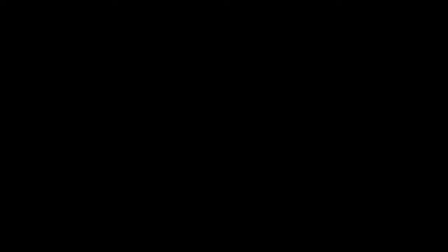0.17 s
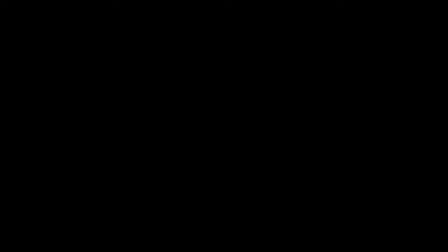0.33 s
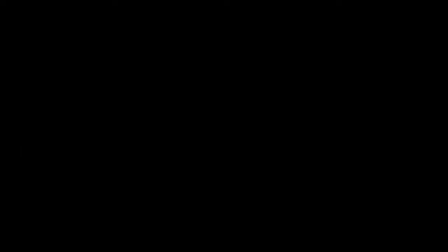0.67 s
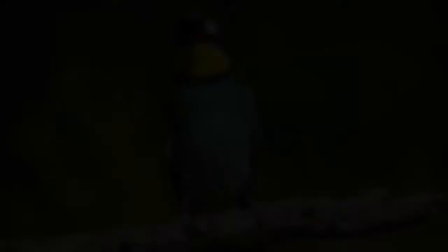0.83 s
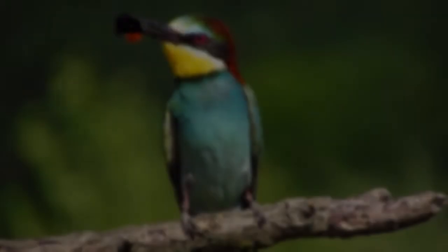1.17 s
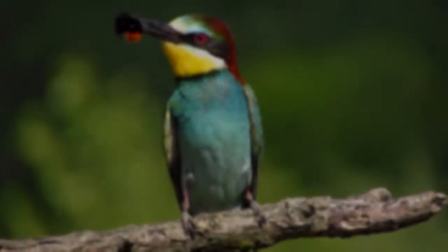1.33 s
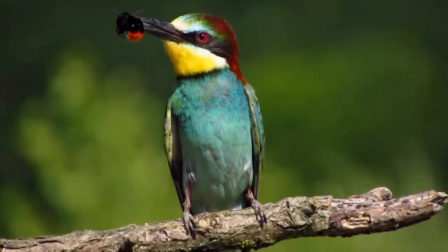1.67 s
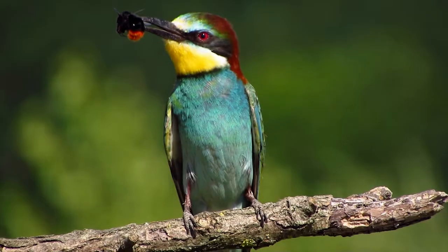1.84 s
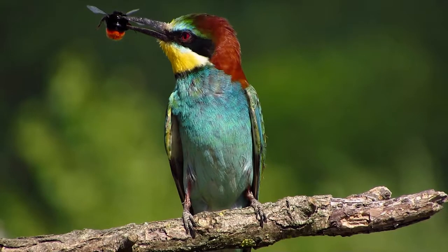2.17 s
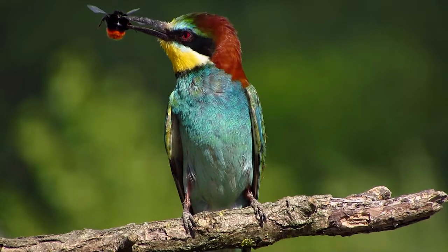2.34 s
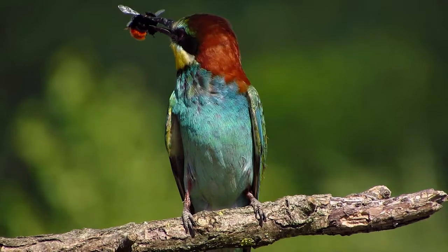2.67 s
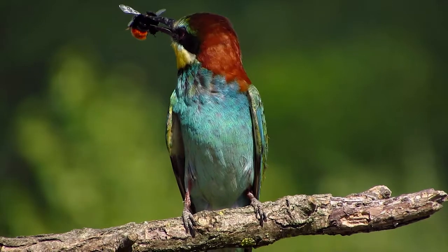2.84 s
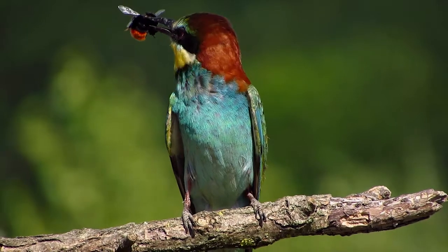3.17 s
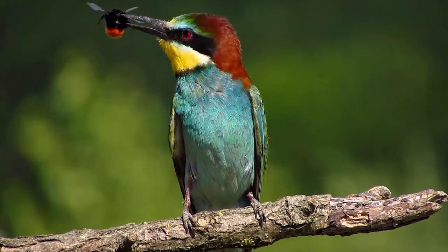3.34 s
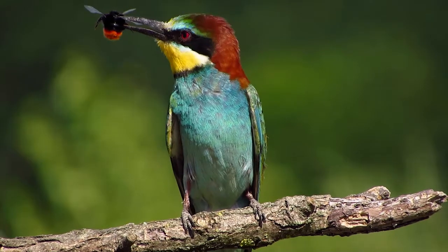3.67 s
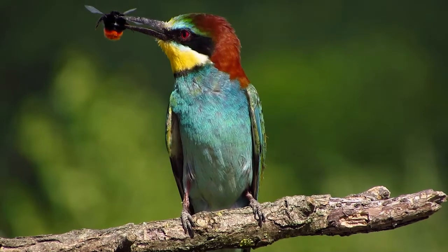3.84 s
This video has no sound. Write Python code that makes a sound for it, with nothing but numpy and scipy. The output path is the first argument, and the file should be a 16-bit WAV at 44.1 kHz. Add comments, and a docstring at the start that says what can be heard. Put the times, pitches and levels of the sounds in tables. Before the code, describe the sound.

A bee-eater gives very short, rounded whistled pips near 0.2, 0.6, 1.0 and 3.3 seconds, the first almost lost as everything fades in from silence until about 1.9. A farther bird answers in lower soft pairs near 1.8 and 3.5. Faint songbird notes come before 1.4, grasshopper scrapes near 1.7, 2.8 and 3.9; a frog rattles, slowing, from 3.1 to 3.8, over soft hiss and hollow drone.

```python
"""A branch outdoors: a bee-eater gives four short, soft pips, and a second bird answers from farther off.
A water frog rattles once, beside a faint songbird and a grasshopper; the whole scene fades in from silence.
The birds are gliding sines, the near one with an octave lifted by a throat resonance.
The frog is a pulsed stack of harmonics; the grasshopper is high noise gated into strokes.
Behind them lie a fine hiss of shaped noise and a hollow drone of noise in narrow resonances."""
import sys
import numpy as np
from scipy import signal
from scipy.io import wavfile
from scipy.ndimage import uniform_filter1d

SR = 44100
rng = np.random.default_rng(int(sys.argv[2]) if len(sys.argv) > 2 else 0)


def dump_mix(stems):
    """Bounce the given channels to the path in sys.argv[1] as a 16-bit WAV at rate SR."""
    frames = np.atleast_2d(stems).T  # one column per channel
    limited = np.clip(frames, -1, 1)  # hard clip at full scale
    pcm = np.round(limited * 32767).astype(np.int16)
    wavfile.write(sys.argv[1], SR, pcm)


N = 176400
T = np.arange(N) / SR  # time in s
FFT_SIZE, HOP = 4096, 1024  # samples
HZ = np.fft.rfftfreq(FFT_SIZE, 1 / SR)


def amp(db):
    """Decibels to gain."""
    return 10 ** (np.asarray(db) / 20)


def unit(x):
    """Scales to rms 1."""
    return x / np.sqrt(np.mean(x ** 2) + 1e-20)


def smooth(x, size, axis=-1):
    """Moving average over a number of points."""
    return uniform_filter1d(x, size=size, axis=axis)


def read(points):
    """Reads a table over frequency, joined on a log axis."""
    f, value = np.transpose(points)
    return np.interp(np.log(HZ + 1), np.log(f + 1), value)


def glide_phase(hz):
    """Adds up a moving frequency into phase, in radians."""
    return 2 * np.pi * np.cumsum(hz) / SR


def panned(x, pan_db):
    """Sets the left channel against the right, which keeps its level."""
    return np.array([x * amp(pan_db), x])


def noise(gain, same, lead, patchy_db, flicker_db):
    """Stereo noise of rms 1 with a given spectrum, drifting patches and a shared flicker."""
    frames = N // HOP + 5
    a, b, c, d, patches = rng.standard_normal((5, frames, len(HZ)))
    patches = smooth(patches, 6, axis=0)  # over time
    patches = unit(smooth(patches, 16, axis=1))  # over frequency
    flicker = unit(smooth(rng.standard_normal(frames), 3))[:, None]
    same = np.clip(same, -1, 1)  # left-right likeness: 1 alike, 0 unrelated, -1 opposed
    right = a + 1j * b
    left = same * right + np.sqrt(1 - same ** 2) * (c + 1j * d)
    spectra = np.array([left * np.exp(1j * lead), right])
    spectra *= gain * amp(patchy_db * patches + flicker_db * flicker)
    sound = signal.istft(spectra.swapaxes(1, 2), nperseg=FFT_SIZE, noverlap=FFT_SIZE - HOP)[1]
    return unit(sound[:, :N])


def air():
    """Soft wide rush and hiss: noise shaped in colour and stereo width."""
    # broad spectrum: f/Hz, relative level/dB per Hz
    colour = [(10, -10), (25, 0), (100, 3.5), (220, 5), (450, 7.5), (650, -1), (1000, 0), (1200, 1),
              (1400, 0.5), (2000, -4), (2800, -3.5), (3600, -6.5), (4600, -9.5), (7000, -9.5), (8500, -14),
              (9300, -11.5), (10000, -15), (13000, -19.5), (14500, -28.5)]
    # stereo width: f/Hz, left-right likeness
    likeness = [(25, 0.99), (70, 0.028), (130, -0.68), (220, -0.84), (500, -0.78), (680, 0.18),
                (1150, -0.14), (1500, -0.23), (2500, -0.00011), (14000, 0.086)]
    level_db = -49.5
    return amp(level_db) * noise(amp(read(colour)), read(likeness), 0, patchy_db=0.87, flicker_db=0.66)


def drone():
    """Hollow distant ambience: noise ringing in narrow, fixed resonances."""
    # resonances: f/Hz, width/Hz, relative level/dB
    resonances = [(276.2, 7.4, -4.5), (291.3, 24, -11.5), (355.5, 5.4, -10.5), (482, 7.7, -10.5),
                  (586.5, 23.7, 4.5), (662, 44, -9.5), (715, 24.6, 1.5), (752, 27, 0), (800, 56, -2.5),
                  (911, 69, -3.5), (993.3, 30, -4), (1140, 59.6, -12), (1235, 22.4, -7.5)]
    # phase by which the left leads: f/Hz, lead/rad
    left_lead = [(280, -.3), (580, -0.98), (780, -1.02), (1000, -0.87), (1250, -0.3)]
    # slow swell: t/s, change of level/dB
    swell = [(0, -0.2), (1.2, 0.46), (2, -0.1), (2.5, 0.3), (3, 0.5), (4, 1.3)]
    level_db, likeness = -48, .93
    power = sum(amp(db) ** 2 / (1 + ((HZ - hz) / width) ** 2 * 2) ** 2 for hz, width, db in resonances)
    level = amp(level_db + np.interp(T, *np.transpose(swell)))
    return level * noise(np.sqrt(power), likeness, read(left_lead), patchy_db=1.12, flicker_db=0.1)


def pip(top_s, top_hz, db, pan_db, lead_in_db):
    """A near-pure whistle; its octave shows as it sweeps through the throat resonance."""
    # a swoop up and down, its level dipping briefly just after the top: t/s from the top, pitch/top pitch,
    # level/dB
    shape = [(-.031, .64, -32), (-.019, .75, -14), (-.0125, 0.95, -23), (-.009, .905, -7), (-.004, .97, -8),
             (-.0015, .995, 1), (.001, 0.92, -3.5), (.0045, .96, -3), (.006, .93, -31), (.008, .9, -5.5),
             (.013, .86, -8.5), (.017, .81, -19), (.028, .74, -34)]
    lead_in_s = .012  # points earlier than this before the top take the lead-in level
    octave_db, throat_db = -29, -5  # octave's floor and the resonance's lift
    throat_hz, throat_width_hz = 2980, 240
    s, ratio, level = np.transpose(shape)
    level = level + lead_in_db * (s < -lead_in_s)
    hz = top_hz * smooth(np.interp(T - top_s, s, ratio), 90)
    envelope = smooth(amp(np.interp(T - top_s, s, level, left=-200, right=-200)), 50)
    phase = glide_phase(hz)
    resonance = 1 / (1 + ((2 * hz - throat_hz) / throat_width_hz) ** 4)
    octave = amp(octave_db) + amp(throat_db) * resonance
    whistle = np.sin(phase) + octave * np.sin(2 * phase)
    return panned(amp(db) * envelope * whistle, pan_db)


def near_bird():
    """The bee-eater's pips, each a whistled arch of its own pitch and level."""
    # pips: t/s at the top of the arch, top f/Hz, level/dB, left minus right/dB, rising lead-in's change/dB
    pips = [(.2235, 2175, -22, -4, -7), (0.6067, 2125, -22, -4, -1.5), (1.0365, 2128, -22, -4, -1),
            (3.293, 2100, -26.5, -6, -3)]
    return sum(pip(*row) for row in pips)


def twitter(middle_s, length_s, first_hz, last_hz, db):
    """A faint gliding whistle: a sine under a rounded swell."""
    u = np.clip((T - middle_s) / length_s + .5, 0, 1)  # 0 to 1 through the note
    phase = glide_phase(first_hz + (last_hz - first_hz) * u)
    return amp(db) * np.sin(np.pi * u) ** 2 * np.sin(phase)


def songbird():
    """A distant songbird: a handful of short glides, most of them falling."""
    # notes: middle t/s, length/s, first f/Hz, last f/Hz, level/dB
    notes = [(.41, .045, 5500, 4700, -59), (0.453, .05, 3100, 3740, -54.5), (0.793, .03, 3750, 3650, -58),
             (.82, .05, 3350, 2930, -60), (1.395, .035, 3850, 3570, -56)]
    return sum(twitter(*row) for row in notes)


def grasshopper():
    """Leg strokes as quick, high scrapes of noise that grow through each bout."""
    # bouts: first stroke t/s, last stroke t/s, level of the last/dB
    bouts = [(1.606, 1.89, -59.5), (2.725, 2.925, -58), (3.746, 3.985, -59)]
    # scrape spectrum: f/Hz, relative level/dB per Hz
    colour = [(10, -60), (5000, -35), (7500, 4), (9000, -2), (11000, 2), (13000, -8), (14500, -12)]
    gap_s, width_s, growth_db_per_s = .04, 0.0042, 14
    strokes = np.zeros(N)
    for first, last, db in bouts:
        for s in np.arange(first, last + gap_s / 2, gap_s):
            level = amp(db - growth_db_per_s * (last - s))
            strokes += level * np.exp(-((T - s) / width_s) ** 2 / 2)
    return strokes * noise(amp(read(colour)), same=.2, lead=0, patchy_db=1, flicker_db=2.5)


def answer(top_s, top_hz, db):
    """A slower, lower sine arch that trails off downwards."""
    bend_s, sag = 0.039, .21  # sag: greatest share by which the pitch drops
    rise_s, fall_s, pan_db = 0.011, 0.025, -8.5
    t = T - top_s
    hz = top_hz * (1 - sag * t ** 2 / (t ** 2 + bend_s ** 2))
    envelope = (1 + (t / np.where(t < 0, rise_s, fall_s)) ** 2 / 2) ** -2
    return panned(amp(db) * envelope * np.sin(glide_phase(hz)), pan_db)


def far_bird():
    """The second bird's answers, in pairs of soft arches."""
    # notes: t/s at the top of the arch, top f/Hz, level/dB
    notes = [(1.821, 1660, -51), (1.901, 1780, -44), (3.482, 1674, -49.5), (3.563, 1782, -43)]
    return sum(answer(*row) for row in notes)


def frog():
    """A slowing train of buzzy, uneven pulses, each rising in pitch, coloured by the vocal sacs."""
    # the rattle: t/s, pulse rate/Hz, level/dB, centre of the voice f/Hz, share of its full width
    croak = [(3.112, 64, -54, 2120, .35), (3.13, 58, -43.5, 2143, 0.44), (3.24, 48, -45.5, 2200, 0.78),
             (3.38, 42, -47.5, 2190, 1), (3.6, 40, -48, 2180, 1), (3.69, 36, -49.5, 1920, 0.81),
             (3.77, 38, -53, 1750, 0.52)]
    pitch_hz, sweep, jitter = 369, .11, .011  # sweep and jitter are shares of the pitch
    open_share, full_width_hz = .84, 560  # share of each cycle that sounds
    uneven_db, pan_db = 0.3, -9.5
    s, rate, db, centre, spread = np.transpose(croak)
    cycle = np.cumsum(np.interp(T, s, rate) * (T > s[0])) / SR % 1
    u = np.minimum(cycle / open_share, 1)  # 0 to 1 through each pulse
    wobble = unit(smooth(rng.standard_normal(N), 150))
    hz = pitch_hz * (1 + sweep * (u - .5) + jitter * wobble)
    phase = glide_phase(hz)
    voice_hz = np.interp(T, s, centre)
    width_hz = full_width_hz * np.interp(T, s, spread)
    uneven = amp(uneven_db * unit(smooth(rng.standard_normal((10, N)), 900)))
    buzz = np.zeros(N)
    for k in range(3, 10):  # harmonics, their phases scattered by k squared
        resonance = 1 / (1 + ((k * hz - voice_hz) / width_hz) ** 4)
        buzz += uneven[k] * np.cos(k * phase + k * k) * resonance
    pulses = np.sqrt(abs(np.sin(np.pi * u)) / 2)
    level = amp(np.interp(T, s, db, left=-200, right=-200))
    return panned(buzz * pulses * level, pan_db)


def outdoors(x):
    """Adds one faint echo and a short scatter from the foliage, as decaying noise."""
    echo_s, echo_db, tail_t60_s, tail_db = 0.03, -29.5, 0.17, -13.5
    t = T[:SR // 2]
    tail = rng.standard_normal((2, len(t))) * amp(-60 * t / tail_t60_s) * (t > .003)
    response = amp(tail_db) * tail / np.linalg.norm(tail[0])
    response[:, round(echo_s * SR)] += amp(echo_db)
    return x + signal.fftconvolve(x, response, axes=1)[:, :N]


def scene():
    """Birds and frog among foliage, with grasshopper, hiss and drone added dry."""
    voices = near_bird() + songbird() + far_bird() + frog()
    return outdoors(voices) + grasshopper() + air() + drone()


def record(dry):
    """Two narrow notches in the microphone's response, a linear fade-in, then the band limit."""
    # microphone notches: f/Hz, half width/Hz
    notches = [(3930, 165), (7870, 92)]
    fade_start_s, fade_end_s, edge_hz = 0.11, 1.946, 14500
    for hz, half_width in notches:
        dry = signal.lfilter(*signal.iirnotch(hz, hz / (2 * half_width), SR), dry)
    faded = dry * np.clip((T - fade_start_s) / (fade_end_s - fade_start_s), 0, 1)
    low_pass = signal.firwin(511, edge_hz, window=("kaiser", 9), fs=SR)
    return signal.oaconvolve(faded, low_pass[None], "same")


dry = scene()
out = record(dry)
dump_mix(out)
```